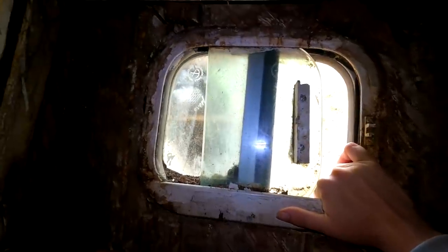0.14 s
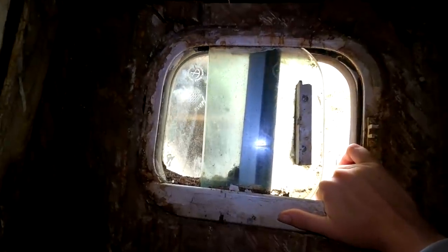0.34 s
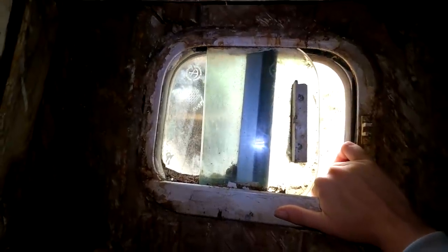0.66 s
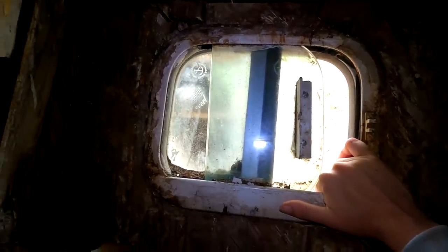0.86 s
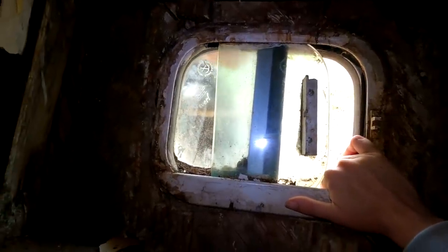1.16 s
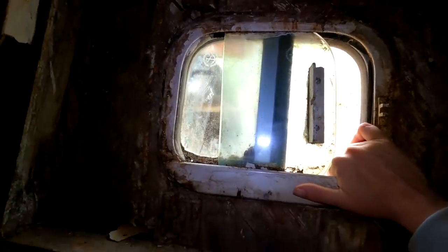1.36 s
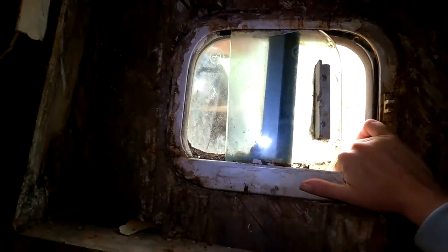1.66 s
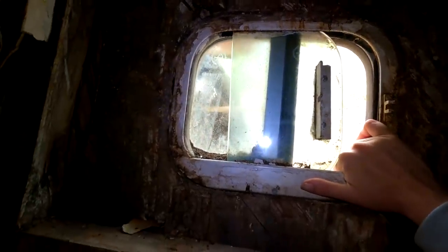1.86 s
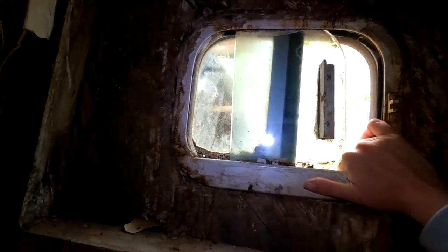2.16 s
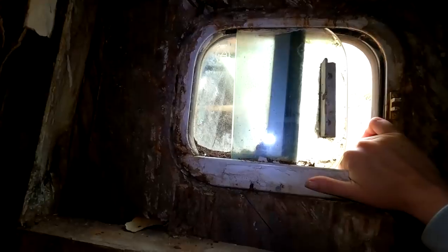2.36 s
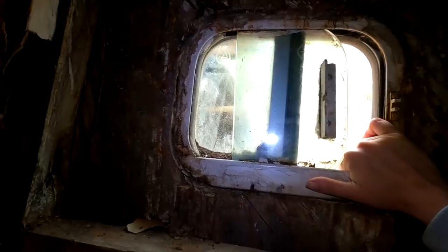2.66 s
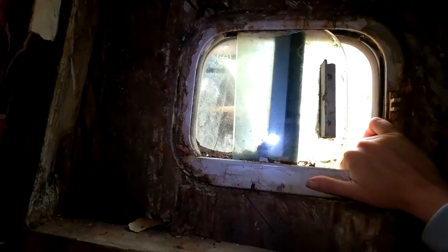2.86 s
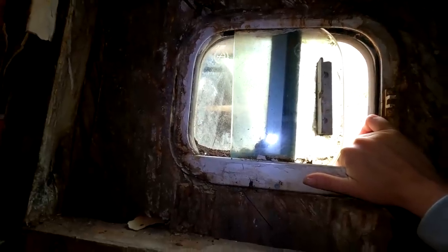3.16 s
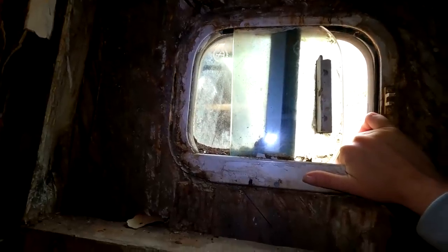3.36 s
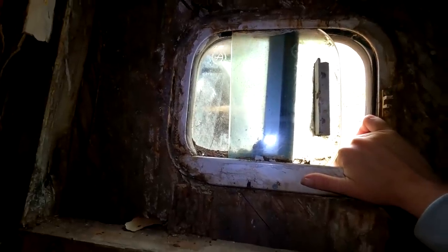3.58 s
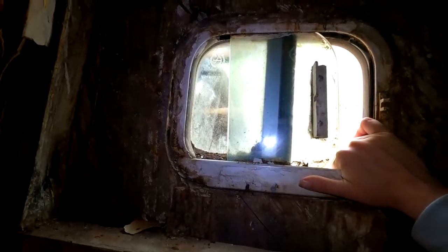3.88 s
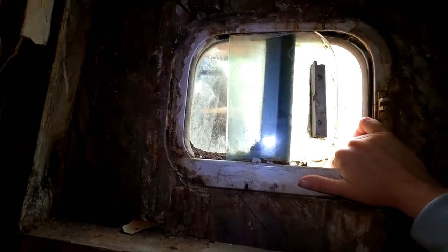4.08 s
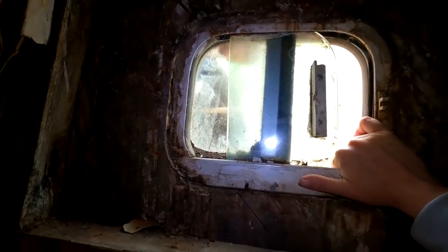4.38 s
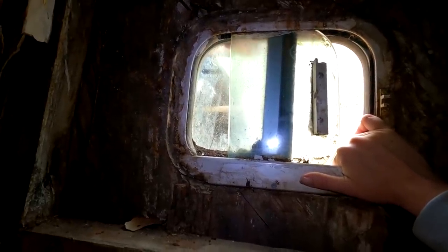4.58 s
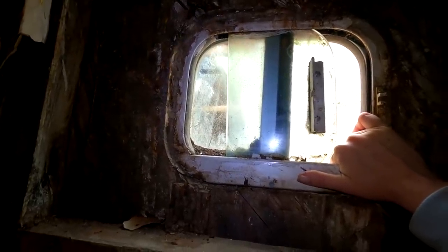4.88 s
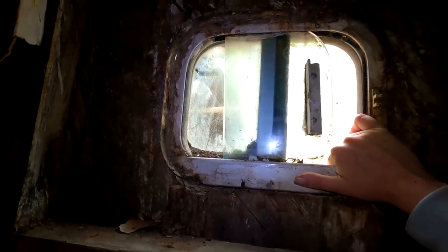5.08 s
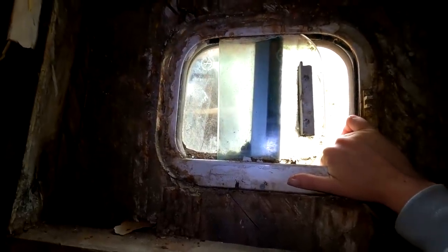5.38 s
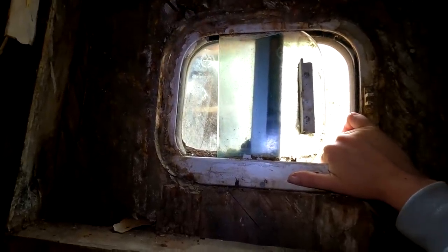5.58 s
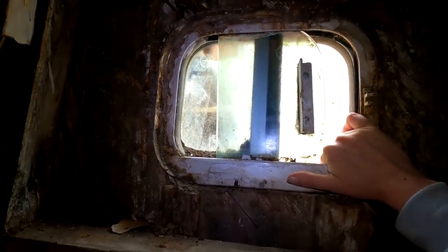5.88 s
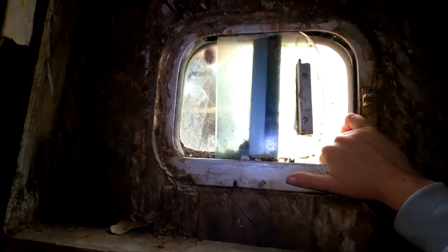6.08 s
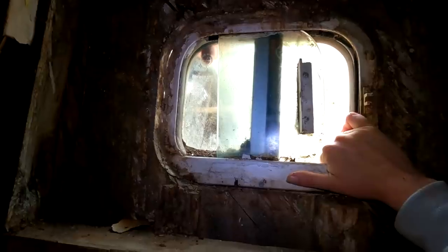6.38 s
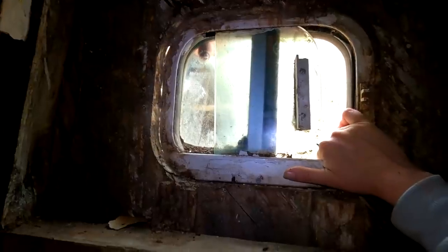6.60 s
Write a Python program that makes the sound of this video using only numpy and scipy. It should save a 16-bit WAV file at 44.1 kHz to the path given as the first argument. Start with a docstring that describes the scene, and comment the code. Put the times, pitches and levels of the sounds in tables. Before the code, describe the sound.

Close up in a small wooden boat cabin, a hand works a stuck old window frame. Brittle sealant and rust give way in sharp irregular snaps, with gritty crunching between them and short low knocks from the hull. A hard crack comes early, then quick clusters, a finer crackly stretch, more knocks and a dense crunch at the end. Little reverberation; faint low cabin air underneath.

```python
"""Brittle sealant and rust crack in short snaps as a hand works an old window frame loose inside a wooden boat.
Each crack is a decaying burst of frame modes, a bright noise edge and a thump of hull modes.
Between cracks random grains crunch in the joint; roughened gliding tones give the frame's rubs and squeaks
and one faint ring of the pane. Filtered ticks make a thin treble hiss; coloured noise makes the faintly
rumbling cabin air."""
import sys
import numpy as np
from scipy import signal
from scipy.fft import rfft, irfft, next_fast_len
from scipy.io import wavfile
from scipy.ndimage import map_coordinates

SR = 44100
rng = np.random.default_rng(int(sys.argv[2]) if len(sys.argv) > 2 else 0)


def wav_record(signal):
    """Record a signal, one row per channel, as 16-bit PCM in the file named by sys.argv[1]."""
    frames = np.transpose(np.atleast_2d(signal))
    bounded = np.clip(frames, -1, 1)
    # unit amplitude maps onto the largest positive 16-bit level
    quanta = np.round(bounded * 32767).astype(np.int16)
    wavfile.write(sys.argv[1], SR, quanta)


N = 297498


def amp(db):
    """dB to gain."""
    return 10 ** (np.asarray(db) / 20)


def rms_one(x):
    """Scale to rms 1."""
    return x / np.sqrt(np.mean(x ** 2) + 1e-20)


def lowpass(x, order, cutoff_hz):
    """Butterworth low-pass."""
    return signal.sosfilt(signal.butter(order, cutoff_hz, fs=SR, output="sos"), x)


def bandpass(x, order, low_hz, high_hz):
    """Butterworth band-pass."""
    return signal.sosfilt(signal.butter(order, [low_hz, high_hz], "band", fs=SR, output="sos"), x)


def colour(x, spectrum):
    """Shape x by a spectrum table, interpolated over log frequency; rms 1."""
    size = next_fast_len(N)
    hz = np.maximum(np.arange(size // 2 + 1) * SR / size, 1)
    at_hz, level_db = np.transpose(spectrum)
    gain = amp(np.interp(np.log(hz), np.log(at_hz), level_db))
    return rms_one(irfft(rfft(x, size) * gain, size)[:N])


def ring(clicks, hz, t60_s):
    """Two-pole resonator: a unit click starts a decaying sine of height 1."""
    r, w = amp(-60 / (t60_s * SR)), 2 * np.pi * hz / SR
    return signal.lfilter([0, np.sin(w)], [1, -2 * r * np.cos(w), r * r], clicks + 1e-18)


def grains(per_s, size_spread_db):
    """Random clicks of either sign, a few much larger than the rest."""
    sizes = amp(size_spread_db * np.minimum(rng.exponential(1, N), 4))
    signs = rng.choice([-1, 1], N)
    return sizes * signs * (rng.random(N) < per_s / SR)


def add(track, rows, times_s):
    """Mix each row into the track at its time."""
    for row, s in zip(rows, times_s):
        at = int(s * SR)
        track[at:at + len(row)] += row[:max(len(track) - at, 0)]


# cabin air spectrum: (frequency [Hz], relative density [dB per Hz])
AIR = [(15, -68), (25, 14.5), (101, 9.5), (209, -1.5), (410, -18.5), (457, -4), (970, -13), (1530, -15),
       (2300, -13), (2700, -12), (3720, -26), (7100, -25.5), (9050, -44), (10900, -57), (15500, -97)]
AIR_DB = -47   # rms


def cabin_air():
    """Steady noise with the spectrum of the cabin air, heaviest in the bass."""
    return amp(AIR_DB) * colour(rng.standard_normal(N), AIR)


CABIN_T60_S, CABIN_DB, CABIN_DULL_HZ = 0.19, -21, 3140


def cabin(x):
    """A short, dull wash of reflections from the wooden walls: convolution with decaying noise."""
    t = np.arange(SR // 2) / SR
    wash = rng.standard_normal(len(t)) * amp(-60 * t / CABIN_T60_S) * np.clip(t / 0.0014, 0, 1)
    wash = signal.lfilter(*signal.butter(1, CABIN_DULL_HZ, fs=SR), wash)
    return signal.fftconvolve(x, wash / np.sqrt(np.sum(wash ** 2)))[:N]


# treble hiss: (time [s], level [dB])
TREBLE = [(0.0, -83), (0.7, -83), (1.26, -96), (1.8, -92), (1.95, -79), (2.3, -74.5), (2.8, -75),
          (2.87, -79), (3.17, -73), (3.35, -84), (3.9, -81), (4.39, -94), (4.43, -74), (4.75, -70),
          (5.45, -71), (5.7, -76), (6.3, -82), (6.74, -80)]


def treble():
    """Thin crackling hiss: dense random ticks, band-passed, on a drawn level curve."""
    s, level_db = np.transpose(TREBLE)
    ticks = bandpass(grains(5000, size_spread_db=6.5), 6, 7500, 11500)
    return amp(np.interp(np.arange(N) / SR, s, level_db)) * rms_one(ticks)


SWELL_DB, FADE_DB = 21.5, 23.5   # a tone starts and ends this far under its loudest
HALF_LINES_DB = -12.5   # fainter lines between the overtones, re overtones
THIRD_HARMONIC_DB = -3   # re second harmonic
STEADY_SHARE = 0.25   # re the random modulation
# tones of the window: the frame sliding in its seat and, at 4.129 s, the pane ringing faintly:
# (start [s], swell [s], hold [s], fade [s], nominal loudest [dB],
# start pitch [Hz], end pitch [Hz], overtones re fundamental [dB], roughness of fundamental [Hz])
WINDOW_TONES = [(1.42, 0.059, .08, 0.012, -69, 6730, 6800, -30, 200),
                (1.655, 0.019, 0.11, 0.026, -47, 1374, 1310, 2.5, 262.4),
                (3.52, 0.054, 0.041, .01, -29, 897, 1250, -13, 220.8),
                (3.7, 0.047, 0.217, 0.042, -53.5, 1595, 1524, -18, 89.8),
                (4.129, .015, 0.15, .03, -56, 2790, 2720, -32, 162.5),
                (5.2, 0.026, 0.026, 0.036, -41, 692, 644, -9, 59.4),
                (5.29, 0.049, 0.03, 0.034, -34.5, 607, 612, -13, 60.6),
                (5.941, 0.037, .085, 0.021, -34, 1312, 1468, -6.5, 130.3)]


def window_tones():
    """Gliding tones with overtones, smeared in proportion to their order, as uneven stick-slip does in a rub."""
    out = np.zeros(N)
    for s, swell, hold, fade, loudest_db, start_hz, end_hz, overtones_db, rough_hz in WINDOW_TONES:
        t = np.arange(0, swell + hold + fade, 1 / SR)
        swell_drop_db = SWELL_DB * (1 - t / swell)
        fade_drop_db = FADE_DB * (t - swell - hold) / fade
        level_db = loudest_db - np.maximum(np.maximum(swell_drop_db, fade_drop_db), 0)
        hz = start_hz + (end_hz - start_hz) * t / t[-1]
        cycles = np.cumsum(hz) / SR
        gate = np.clip(np.minimum(t, t[-1] - t) / 0.021, 0, 1)
        half_db = overtones_db + HALF_LINES_DB   # in a rub every second slip is weaker
        partials = ((1, 0), (2, overtones_db), (3, overtones_db + THIRD_HARMONIC_DB),
                    (3 / 2, half_db), (5 / 2, half_db))
        for multiple, db in partials:
            wobble = map_coordinates(rng.standard_normal(2000), [2 * multiple * rough_hz * t], order=3)
            tone = np.sin(2 * np.pi * multiple * cycles)
            add(out, [np.sqrt(2) * gate * amp(level_db + db) * (STEADY_SHARE + wobble) * tone], [s])
    return out


RAMP_DB = 20   # drop at the start of a build-up and the end of a let-go
# joint under the resting hand: (grit [dB], crumbling [dB], rumble [dB])
RESTING_DB = [-61, -58.5, -45]
# shoves of the hand: (full strain from [s], build-up [s], hold [s], let-go [s],
# fine grit [dB], coarse crumbling [dB], planking rumble [dB])
SHOVES = [(0.09, 0.3, 0.039, 0.14, -51, -53, -50), (0.315, 0.14, .01, 0.055, -35, -37.5, -33.5),
          (0.592, 0.022, 0.031, 0.05, -44, -40, -35), (0.729, 0.027, 0.007, 0.061, -42.5, -40, -44),
          (0.901, 0.04, 0.014, 0.025, -43.5, -34, -43), (1.13, 0.027, .12, 0.044, -48.5, -38, -33.5),
          (1.345, 0.02, 0.013, 0.017, -46, -41, -39), (1.536, 0.047, 0.045, 0.052, -60, -45, -38.5),
          (1.662, 0.07, .11, 0.12, -49.5, -45.5, -44), (1.889, 0.08, 0.011, 0.12, -42, -43.5, -30),
          (2.087, 0.45, 0.21, 0.12, -48, -49.5, -66), (2.365, 0.31, 0.038, 0.18, -37.5, -39, -44.5),
          (2.579, 0.087, 0.21, 0.063, -40, -41, -46), (2.929, 0.078, 0.014, 0.21, -42.5, -46.5, -47),
          (3.08, 0.041, .01, .13, -50, -49, -54), (3.245, 0.075, 0.033, 0.097, -38.5, -39, -53),
          (3.6, 0.22, 0.0084, 0.12, -44, -37, -33.5), (4.047, 0.0067, 0.0068, 0.027, -64, -28.5, -35),
          (4.122, 0.017, 0.0067, .1, -54, -38, -29), (4.23, 0.077, 0.054, 0.05, -58, -49, -44),
          (4.446, 0.043, 0.12, 0.32, -46, -53, -43), (4.761, 0.34, 0.057, 0.094, -39.5, -42.5, -39),
          (4.903, 0.059, 0.0089, 0.036, -46, -42.5, -50), (5.087, 0.062, 0.085, 0.047, -39.5, -42, -35.5),
          (5.35, 0.17, .01, 0.076, -50.5, -45.5, -32.5), (5.437, 0.077, 0.095, 0.45, -53, -63, -45),
          (5.844, 0.09, 0.092, 0.059, -47, -49, -36), (6.007, 0.038, 0.097, .08, -43, -42.5, -44),
          (6.214, 0.026, .01, .09, -47.5, -43, -34), (6.32, 0.058, 0.063, 0.087, -49.5, -54, -43.5),
          (6.507, 0.072, 0.023, 0.054, -29.5, -30, -25), (6.678, 0.053, 0.0064, 0.11, -37.5, -33, -32)]


def strain():
    """Levels in dB of grit, crumbling and rumble: each shove builds up, holds and lets go; powers add."""
    t = np.arange(N) / SR
    power = amp(RESTING_DB)[:, None] ** 2
    for s, build, hold, let_go, *level_db in SHOVES:
        away = np.maximum(np.maximum((s - t) / build, (t - s - hold) / let_go), 0)
        power = power + amp(level_db)[:, None] ** 2 * amp(-2 * RAMP_DB * away)
    return 10 * np.log10(power)


SHAKE_DB, SHAKE_T60_S, SHAKE_RISE_S = -12, 0.19, 0.0035   # dB re the thump


def after_shake():
    """Strength of the planking's rumble that each thump of CRACKS leaves behind: a decaying power, smoothed."""
    s, thump_db = np.array(CRACKS)[:, 0], np.array(CRACKS)[:, -1]
    kicks = np.zeros(N)
    kicks[(s * SR).astype(int)] = amp(2 * (thump_db + SHAKE_DB))
    dying = np.sqrt(signal.lfilter([1], [1, -amp(-120 / (SHAKE_T60_S * SR))], kicks + 1e-18))
    return lowpass(dying, 2, 1 / (2 * np.pi * SHAKE_RISE_S))


# fine grit spectrum: (frequency [Hz], relative density [dB per Hz])
GRIT = [(710, -43), (1200, -38), (1710, 6), (1960, 4.5), (2280, 6.5), (2570, 5), (3690, 5), (5730, -4),
        (8240, -18), (8980, -25), (10900, -26), (13500, -78), (15500, -81)]
# frame and pane modes: (frequency [Hz], relative level [dB], free t60 [s])
FRAME = [(552, 2, 0.043), (690.5, 7, 0.018), (862, 0.5, 0.015), (948, -4, 0.03), (1117, -5, 0.026),
         (1271, 4.5, 0.016), (1512, 7.5, 0.018), (1885, 6, 0.016), (2095, 0.5, 0.022), (2497, 1, 0.016),
         (2760, 0, 0.016), (3048, 4, 0.013), (3460, -2.5, 0.018), (3748, 6.5, 0.01), (4160, 3, 0.015),
         (4540, 5, 0.014), (4934, 2.5, 0.018), (5430, 9, 0.01)]
# hull planking modes: (frequency [Hz], relative level [dB], free t60 [s])
HULL = [(75, -19, 0.45), (108.5, -12.5, 0.18), (125.5, -10, 0.37), (165.4, 0, 0.19), (212, 1.5, 0.17),
        (242, 0, 0.09), (261.6, 9, 0.065), (318, 9, 0.063), (361.6, -1, 0.082), (375, -1, 0.078),
        (374, -12, 0.19)]


def joint(strain_db):
    """Under strain fine grit crackles, coarser crumbs tap the lower frame modes and the planking rumbles."""
    grit_db, crumb_db, rumble_db = strain_db
    grit = colour(grains(2500, size_spread_db=3.0), GRIT)
    # modes ring shorter here than when free
    crumbs = sum(amp(db) * ring(grains(600, size_spread_db=3.0), hz, 0.57 * t60) for hz, db, t60 in FRAME[:7])
    rumble = sum(amp(db) * ring(grains(400, size_spread_db=5.5), hz, 0.27 * t60) for hz, db, t60 in HULL[2:])
    rumble_level = np.hypot(amp(rumble_db), after_shake())
    return amp(grit_db) * grit + amp(crumb_db) * rms_one(crumbs) + rumble_level * rms_one(rumble)


SMALL_CRACKS_PER_S = 55
SMALL_KNOCK_DB, SMALL_SNAP_DB, SMALL_EDGE_DB, SMALL_THUMP_DB = 6, 9.5, -18, -12   # re crumbs, grit, grit, rumble
SMALL_KNOCK_HZ, SMALL_SNAP_HZ, SMALL_PITCH_OCTAVES, SMALL_SCATTER_DB = 940, 2730, 0.12, 2.5


def small_cracks(strain_db):
    """Table of lesser cracks at random moments, as strong as the joint is strained; columns as CRACKS."""
    s = np.sort(rng.uniform(0, N / SR, int(SMALL_CRACKS_PER_S * N / SR)))
    grit_db, crumb_db, rumble_db = strain_db[:, (s * SR).astype(int)]
    size, knock, snap, edge, thump, low, high = np.clip(rng.standard_normal((len(s), 7)), -2, 2).T

    def vary(draw):
        """Scatter in dB: the crack's size plus a draw of the part's own."""
        return SMALL_SCATTER_DB * (size + draw)

    return np.transpose([s,
                         crumb_db + SMALL_KNOCK_DB + vary(knock),
                         SMALL_KNOCK_HZ * 2 ** (SMALL_PITCH_OCTAVES * low),
                         grit_db + SMALL_SNAP_DB + vary(snap),
                         SMALL_SNAP_HZ * 2 ** (SMALL_PITCH_OCTAVES * high),
                         grit_db + SMALL_EDGE_DB + vary(edge),
                         rumble_db + SMALL_THUMP_DB + vary(thump)])


def near(centre_hz, spread_octaves):
    """dB weight of each frame mode: those far from where a crack sounds are hardly moved."""
    octaves = np.log2(np.array(FRAME)[:, 0] / centre_hz[:, None]) / spread_octaves
    return np.maximum(-6 * octaves ** 2, -40)


def blows(modes, weights_db, size, tear_s, scatter_db, count):
    """One ring of the modes per row of weights, in count soft-edged slips; peak 1.
    A single push sets all modes off the same way; a tear moves them every which way."""
    hz, level_db, t60_s = np.transpose(modes)
    t = np.arange(size) / SR
    onset = 1 - np.exp(-(t / (0.32 * tear_s)) ** 2)
    shapes = np.sin(2 * np.pi * hz[:, None] * t) * amp(-60 * t / t60_s[:, None]) * onset
    draws = np.clip(rng.standard_normal((len(weights_db), count, 2, len(hz))), -2, 2)
    out = np.zeros((len(weights_db), size))
    for slip in range(count):
        signs = np.sign(draws[:, slip, 1] if count > 1 else draws[:, slip, 1, :1])
        gains = amp(weights_db + level_db + scatter_db * draws[:, slip, 0]) * signs
        lag = int(slip * tear_s * SR)
        out[:, lag:] += 0.66 ** slip * (gains @ shapes)[:, :size - lag]
    out = out * np.clip(10 * (1 - t / t[-1]), 0, 1)
    return out / np.abs(out).max(axis=1, keepdims=True)


def bright_edges(count):
    """Short noise bursts in two treble bands; peak 1."""
    t = np.arange(600) / SR
    burst = rng.standard_normal((count, 600)) * amp(-60 * t / 0.02) * np.clip(t / 0.00012, 0, 1)
    edge = bandpass(burst, 3, 5300, 7500) + amp(-19.5) * bandpass(burst, 3, 9200, 11500)
    return edge / np.abs(edge).max(axis=1, keepdims=True)


FRAME_DULL_HZ = 7200   # the frame's ring carries little above this
THUMP_LAG_S = 0.002   # the planking answers a moment after the crack
# main cracks: (time [s], knock peak before dulling [dB], knock centre [Hz], snap peak before dulling [dB],
# snap centre [Hz], bright edge peak [dB], hull thump peak [dB])
CRACKS = [(0.125, -47, 940, -29, 2800, -42, -45), (0.137, -35, 1350, -33, 2480, -42, -33),
          (0.209, -40, 1080, -30, 3700, -39, -47), (0.219, -31.5, 960, -17.5, 3220, -37, -56),
          (0.239, -45, 790, -24, 3130, -40, -49), (0.266, -9, 1040, 0, 2760, -23.5, -15),
          (0.304, -15, 920, -10, 3900, -20, -14.5), (0.331, -37, 1100, -17, 2980, -44, -45),
          (0.362, -44, 1140, -27, 3070, -52, -49), (0.428, -51, 600, -39, 3520, -51, -57),
          (0.583, -40, 910, -35, 2500, -51, -35), (0.602, -33, 880, -24.5, 2020, -57, -31),
          (0.616, -25.5, 870, -20, 2800, -59, -30), (0.675, -16, 623, -16, 2700, -42, -16),
          (0.725, -54, 880, -29, 2860, -56, -39), (0.771, -49, 594, -22, 3270, -49, -40),
          (0.808, -17.5, 1080, -18.5, 2730, -43, -10.5), (0.879, -18.5, 1130, -23.5, 2630, -43, -17.5),
          (0.894, -22, 597, -18, 2860, -34, -18.5), (0.909, -42, 970, -21, 3140, -48, -46),
          (0.923, -40, 790, -25, 3100, -50, -21), (1.016, -34.5, 1360, -33, 1980, -55, -28),
          (1.102, -13, 1170, -21, 2470, -39, -12.5), (1.118, -12, 1200, -17.5, 2580, -58, -18),
          (1.13, -20, 1180, -18, 2180, -59, -40), (1.142, -15.5, 1080, -20, 1970, -55, -15),
          (1.148, -16, 1150, -24, 2070, -55, -28), (1.158, -17, 1130, -19, 2900, -48, -41),
          (1.163, -19, 1040, -29, 2070, -56, -18), (1.17, -33, 1000, -25, 2230, -54, -53),
          (1.176, -22.5, 1010, -18.5, 2730, -41, -33), (1.195, -34, 990, -34, 2010, -61, -25),
          (1.206, -34, 1000, -35, 2900, -58, -35), (1.217, -33, 795, -32, 2230, -64, -25),
          (1.229, -25, 1010, -25.5, 2550, -49, -41), (1.256, -27, 940, -28, 2530, -61, -28),
          (1.349, -23.5, 890, -29, 2150, -57, -22), (1.357, -40, 980, -27.5, 3130, -46, -51),
          (1.514, -28.5, 1130, -28, 2200, -51, -31), (1.529, -31, 930, -38, 1940, -54, -39),
          (1.547, -30, 1370, -37, 1870, -57, -35), (1.566, -5, 1160, -18, 2180, -41, -12.5),
          (1.614, -38, 1000, -41, 3230, -39, -50), (1.622, -33, 980, -26, 2380, -48, -35),
          (1.65, -22, 990, -21.5, 2680, -50, -28.5), (1.764, -15, 1020, -31, 2500, -57, -17),
          (1.779, -22, 940, -29, 2660, -52, -47), (1.873, -6, 1130, 1.5, 3050, -16.5, -11.5),
          (1.893, -47, 597, -23, 2560, -36, -29), (2.014, -23.5, 960, -16.5, 2770, -28.5, -56),
          (2.04, -40, 1050, -21.5, 2600, -48, -55), (2.098, -33, 1330, -12, 2800, -30, -57),
          (2.118, -25, 1080, -9.5, 2970, -23, -47), (2.246, -23, 1010, -3.5, 2830, -23, -27.5),
          (2.268, -29, 1080, -12, 2900, -33, -33), (2.294, -44, 820, -23, 2360, -45, -28),
          (2.322, -50, 960, -20, 2230, -54, -43), (2.352, -43, 845, -21, 2850, -42, -40),
          (2.376, -30, 1340, -6, 3060, -23.5, -26.5), (2.407, -50, 750, -18, 2640, -38, -38),
          (2.48, -36, 1130, -25, 2060, -53, -38), (2.535, -35, 980, -24.5, 2700, -45, -58),
          (2.563, -28.5, 920, -21, 2780, -34.5, -58), (2.621, -31, 910, -22.5, 2170, -47, -51),
          (2.648, -37, 680, -34, 2440, -34, -31), (2.677, -40, 830, -18, 3080, -40, -51),
          (2.694, -31, 1000, -14, 3250, -36, -55), (2.701, -24, 810, -11, 2840, -27.5, -44),
          (2.719, -49, 990, -19, 2850, -35, -45), (2.746, -32, 1140, -10, 2960, -33, -25),
          (2.762, -23.5, 1270, -15, 2960, -37, -52), (2.776, -30, 1030, -16.5, 3180, -30, -41),
          (2.794, -31, 1190, -19, 3900, -42, -29.5), (2.928, -27.5, 770, -25.5, 2840, -35, -43),
          (2.945, -28, 1370, -17.5, 3160, -32, -28), (2.997, -37, 950, -21, 3450, -37, -43),
          (3.03, -30, 945, -21, 3430, -37, -44), (3.063, -21.5, 905, -10.5, 3100, -25.5, -22.5),
          (3.118, -30, 1430, -17.5, 2720, -37, -37), (3.17, -58, 960, -29, 3350, -30, -48),
          (3.184, -27, 1620, -13.5, 4600, -25.5, -45), (3.213, -26.5, 726, -18.5, 2750, -35, -30),
          (3.237, -13, 1320, -6.5, 2940, -26, -19.5), (3.251, -21.5, 1060, -19, 2420, -40, -43),
          (3.274, -25.5, 740, -26, 2730, -28, -28), (3.293, -23, 930, -10, 2600, -27, -23.5),
          (3.463, -30, 1030, -23, 2420, -49, -27.5), (3.487, -14, 1310, -9.5, 1730, -63, -22.5),
          (3.582, -16, 1230, -22, 2730, -44, -45), (3.603, -19, 1130, -16.5, 2570, -34, -23),
          (3.611, -7.5, 1430, -3.5, 2480, -35, -16.5), (3.668, -49, 910, -29.5, 2560, -47, -43),
          (3.802, -42, 1000, -39, 3180, -50, -55), (3.965, -50, 1000, -48, 2560, -45, -53),
          (4.045, -17.5, 654, -19, 2100, -45, -14.5), (4.06, -13, 830, -18, 2260, -57, -16.5),
          (4.113, -10.5, 1340, -5.5, 2930, -29, -18.5), (4.126, -21, 1090, -16.5, 2560, -50, -24),
          (4.157, -43, 1000, -33, 3450, -42, -52), (4.218, -11, 745, -30, 2330, -88, -9.5),
          (4.227, -43, 593, -36, 2200, -61, -36), (4.409, -41, 1190, -12, 2250, -26, -15.5),
          (4.464, -44, 855, -37, 3100, -57, -31), (4.516, -42, 1000, -33, 3280, -48, -57),
          (4.556, -30.5, 870, -28, 3020, -39, -40), (4.578, -37, 1240, -24, 2850, -45, -52),
          (4.588, -42, 870, -28, 3610, -41, -58), (4.654, -34, 860, -21, 3570, -34, -55),
          (4.732, -31, 1140, -12.5, 3430, -27.5, -27), (4.759, -40, 950, -15.5, 2220, -29, -20),
          (4.768, -27, 870, -20, 3360, -28, -46), (4.794, -40, 1030, -26, 2950, -45, -41),
          (4.814, -31, 650, -32, 2670, -42, -31), (4.869, -14, 1310, -6, 2870, -23, -11),
          (4.919, -37, 1190, -32, 3000, -47, -45), (4.99, -59, 1010, -37, 3740, -49, -57),
          (5.119, -39, 1020, -17.5, 2900, -39, -41), (5.143, -31, 1020, -31, 2940, -37, -28),
          (5.348, -27.5, 624, -23, 2360, -43, -33), (5.354, -25, 624, -22.5, 2170, -35, -19),
          (5.369, -22, 700, -22.5, 1970, -43, -21), (5.389, -48, 1000, -44, 3450, -38.5, -55),
          (5.444, -47, 810, -28, 4670, -32.5, -54), (5.483, -10, 1090, -8.5, 2250, -26, -14),
          (5.582, -52, 860, -37, 3500, -31.5, -59), (5.664, -50, 1000, -37, 4330, -39, -53),
          (5.826, -4.5, 1260, -12, 2680, -33, -13.5), (5.842, -11, 1190, -14, 2160, -35, -22),
          (5.865, -9, 1270, -8, 2320, -30, -18), (5.875, -7, 1450, -3, 3100, -32, -15),
          (5.887, -11, 1430, -13, 2880, -44, -19), (5.898, -40, 990, -20, 2720, -32, -20),
          (5.982, -44, 990, -34, 3980, -37.5, -53), (6.084, -28, 1100, -20, 2820, -37, -33),
          (6.09, -24, 910, -23, 2690, -54, -25), (6.112, -5.5, 906, -15.5, 2200, -40, -13.5),
          (6.13, -14, 680, -47, 2330, -59, -21), (6.211, -16.5, 630, -37, 2100, -59, -21.5),
          (6.223, -25.5, 710, -32.5, 2570, -61, -54), (6.312, -39, 810, -30, 2640, -49, -43),
          (6.434, -52, 1010, -34, 3020, -43, -58), (6.475, -24, 1250, -15.5, 2460, -30, -21),
          (6.482, -18.5, 720, -12.5, 2580, -24.5, -27), (6.503, -26, 1120, -11.5, 3180, -33, -16.5),
          (6.523, -26, 890, -13, 2380, -24, -41), (6.534, -23, 950, -18, 2050, -46, -39),
          (6.544, -18, 1150, -10.5, 2320, -27, -40), (6.566, -30, 930, -21, 2370, -41, -27),
          (6.577, -27, 665, -22.5, 2300, -40, -38), (6.627, -47, 1080, -27, 2310, -43, -32),
          (6.653, -45, 680, -19.5, 2640, -33, -35), (6.666, -12.5, 1200, 0.5, 2200, -44, -9.5),
          (6.676, -16.5, 760, -20, 2280, -43, -26), (6.71, -27, 950, -23, 2160, -57, -43)]


def cracks(table):
    """Each crack knocks the lower frame modes, snaps in the upper ones, spits a bright edge and thumps the hull."""
    s, knock_db, knock_hz, snap_db, snap_hz, edge_db, thump_db = np.transpose(table)
    knock = blows(FRAME, near(knock_hz, spread_octaves=0.39), size=3000, tear_s=0.001652, scatter_db=3.5, count=2)
    snap = blows(FRAME, near(snap_hz, spread_octaves=0.56), size=2000, tear_s=0.001, scatter_db=3.0, count=2)
    thump = blows(HULL, np.zeros((len(s), 1)), size=10000, tear_s=0.0036, scatter_db=3.0, count=1)
    edge = bright_edges(len(s))
    knock, snap = lowpass(knock, 4, FRAME_DULL_HZ), lowpass(snap, 4, FRAME_DULL_HZ)
    out = np.zeros(N)
    for rows, db in ((knock, knock_db), (snap, snap_db), (edge, edge_db)):
        add(out, rows * amp(db)[:, None], s)
    add(out, thump * amp(thump_db)[:, None], s + THUMP_LAG_S)
    return out


def scene():
    """Window, its cabin reflections and the air; one channel."""
    strain_db = strain()
    window = cracks(CRACKS) + cracks(small_cracks(strain_db)) + joint(strain_db) + window_tones() + treble()
    return (window + amp(CABIN_DB) * cabin(window) + cabin_air())[None]


RUMBLE_CUT_HZ, NOTCH_HZ, NOTCH_WIDTH_HZ, STOPBAND_HZ = 76.5, 8920, 220, 16400


def record(dry):
    """The microphone loses the deep bass and has a notch in the treble; peaks are rounded, the top is cut."""
    thin = signal.sosfilt(signal.butter(2, RUMBLE_CUT_HZ, "high", fs=SR, output="sos"), dry)
    notched = signal.lfilter(*signal.iirnotch(NOTCH_HZ, NOTCH_HZ / NOTCH_WIDTH_HZ, fs=SR), thin)
    rounded = 1.2 * np.tanh(notched / 1.34)
    return signal.sosfilt(signal.cheby2(12, 70, STOPBAND_HZ, fs=SR, output="sos"), rounded)


dry = scene()
out = record(dry)
wav_record(out)
```